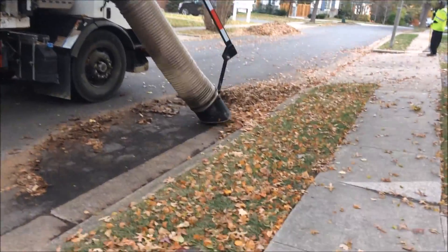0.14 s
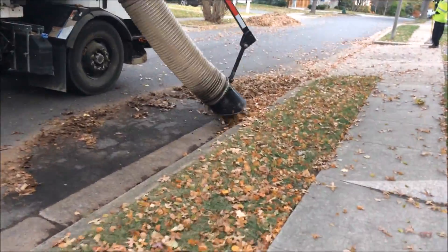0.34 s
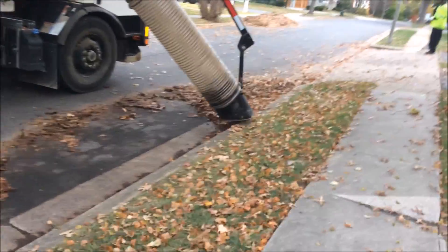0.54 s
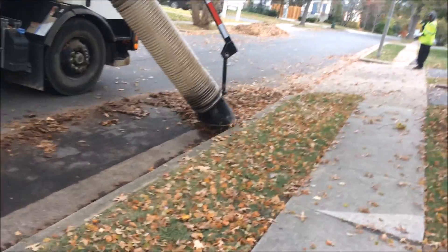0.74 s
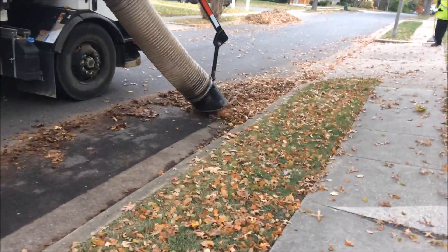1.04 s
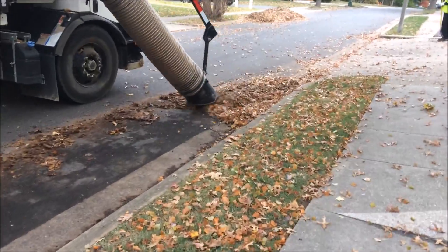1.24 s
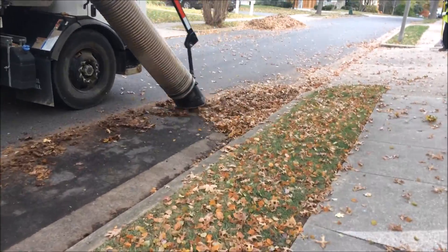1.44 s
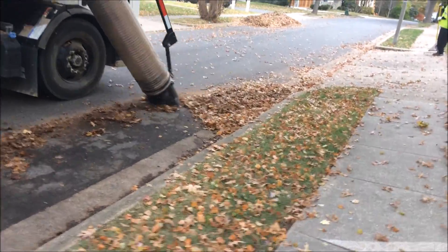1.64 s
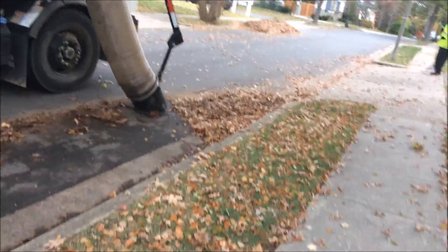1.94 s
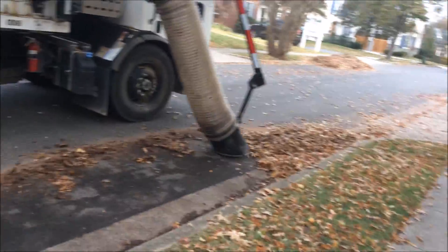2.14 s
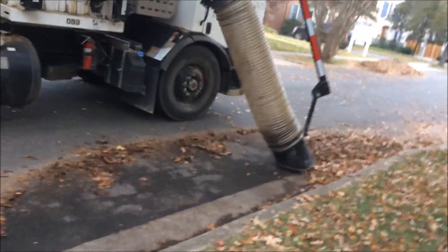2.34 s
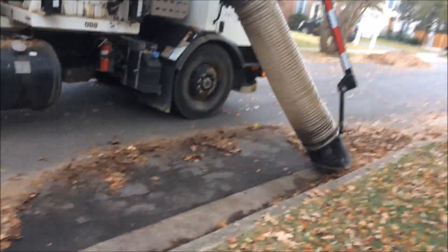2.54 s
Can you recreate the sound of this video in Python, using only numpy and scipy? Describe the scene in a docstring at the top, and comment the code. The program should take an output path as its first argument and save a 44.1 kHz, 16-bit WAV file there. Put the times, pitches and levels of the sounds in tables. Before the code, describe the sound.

Loud leaf vacuum truck with engine hum, rushing air, rustling leaves and a brief thin squeal

```python
"""A diesel drone and a broad rush of air come first: a truck-mounted leaf vacuum working along a kerb.
The engine is a stack of wavering sines over noise that booms in the fan housing; the air is filtered noise.
Leaves rustle as noise shaped by dense tiny impacts, and twigs clatter up the hose as short noise bursts.
Midway comes a thin squeal of sliding sines, likely the brakes of the creeping truck.
The treble dips briefly now and then; both channels are the same."""
import sys
import numpy as np
from scipy import signal
from scipy.fft import rfft, irfft
from scipy.io import wavfile

SR = 44100
rng = np.random.default_rng(int(sys.argv[2]) if len(sys.argv) > 2 else 0)


def output_pcm(signal):
    """Save a mono or channel-first signal as 16-bit PCM at the path in sys.argv[1].

    Samples are clipped to [-1, 1] before scaling.
    """
    pcm = np.clip(np.atleast_2d(signal).T, -1, 1) * 32767
    wavfile.write(sys.argv[1], SR, np.round(pcm).astype(np.int16))


N = 119070  # samples, 2.7 s


def undb(db):
    """Decibels to amplitude gain."""
    return 10 ** (np.asarray(db) / 20)


def unit(x):
    """Scale to rms 1."""
    return x / np.sqrt(np.mean(x ** 2))


def seconds():
    """Time of every sample."""
    return np.arange(N) / SR


def curve(rows, axis=1):
    """One column of a table, joined by straight lines in time."""
    rows = np.array(rows, float)
    return np.interp(seconds(), rows[:, 0], rows[:, axis])


def freqs():
    """Frequencies of the spectrum's bins, kept at 1 Hz or more."""
    return np.maximum(np.arange(N // 2 + 1) * SR / N, 1)


def apply_gain(x, gain):
    """Multiply the spectrum of a sound by a gain per bin."""
    return irfft(rfft(x) * gain, N)


def colour(x, points):
    """Equalise through (Hz, dB) points, straight over log frequency, then scale to rms 1."""
    hz, db = np.array(points, float).T
    return unit(apply_gain(x, undb(np.interp(np.log(freqs()), np.log(hz), db))))


def resonance(x, hz, width_hz):
    """A two-pole band-pass applied twice, each pass 2 * width_hz wide at half power; rms 1."""
    f = freqs()
    detune = (f / hz - hz / f) * hz / width_hz / 2
    return unit(apply_gain(x, 1 / (1 + 1j * detune) ** 2))


def treble(x, hz, order=6):
    """The part of a sound above a frequency, where its amplitude is halved."""
    return apply_gain(x, 1 / (1 + (hz / freqs()) ** order))


def noise():
    """White noise."""
    return rng.standard_normal(N)


def walk(rate):
    """Smooth random drift of rms 1 that changes about rate times a second."""
    return unit(apply_gain(noise(), 1 / (1 + (2 * freqs() / rate) ** 2) ** 2))


def tone(phase, db):
    """A sine with this rms level."""
    return np.sqrt(2) * undb(db) * np.sin(phase)


def turn(hz):
    """Running phase of a frequency curve, from a random start."""
    return 2 * np.pi * (np.cumsum(hz) / SR + rng.random())


def engine():
    """Firing harmonics that throb and wobble, and turbulence booming in the fan housing."""
    # engine speed: start_s [s], firing_hz [Hz]
    speed = [(0, 62.8), (.4, 62.1), (.9, 62.02), (1.5, 62.17), (2.1, 62.51), (2.7, 62.74)]
    # firing harmonics before trim: start_s [s], first_db [dB], second_db [dB], third_db [dB]
    drone_levels = [(0, -28, -35, -23), (.15, -31, -36, -15), (.29, -19.5, -23.5, -25.5),
                    (.39, -25, -23, -26.5), (.46, -17, -31, -18.5), (.53, -26, -33, -21),
                    (.61, -24.5, -25.5, -13), (.79, -27, -32, -16), (.94, -24, -22, -13.5),
                    (1.06, -31, -30.5, -17.5), (1.18, -31, -24.5, -13), (1.42, -29, -20, -27),
                    (1.67, -26, -19, -18.5), (1.95, -30, -21, -21), (2.15, -32, -20.5, -17),
                    (2.25, -27, -20, -27), (2.37, -27, -27, -18.5), (2.53, -26, -21, -16),
                    (2.7, -30, -20.5, -25)]
    # weak higher lines: multiple [of firing rate], level_db [dB, relative to untrimmed third harmonic]
    overtones = [(3.5, -21.5), (5.5, -23.5), (6, -17), (8.5, -24)]
    harmonic_trim_db = (-1, 0, -0.5)
    wobble_rad, throb_db, throb_rate = 0.4, 1.6, 17  # rms radians, rms dB, changes per second
    housing_hz, housing_width_hz, housing_db = 170.8, 32.6, -22.5

    lines = []
    for number, trim_db in enumerate(harmonic_trim_db, start=1):
        lines.append((number, curve(drone_levels, axis=number) + trim_db))
    third_db = curve(drone_levels, axis=3)
    for multiple, level_db in overtones:
        lines.append((multiple, third_db + level_db))

    firing_phase = turn(curve(speed))
    drone = np.zeros(N)
    for multiple, level_db in lines:
        start_phase = 2 * np.pi * rng.random()
        phase = multiple * firing_phase + start_phase + wobble_rad * walk(throb_rate)
        drone += tone(phase, level_db + throb_db * walk(throb_rate))
    boom = undb(housing_db) * resonance(noise(), housing_hz, housing_width_hz)
    return drone + boom


def air(flutter_db=0.75, band_flutter_db=0.76):
    """Turbulent air roaring in the hose: a steady rumble and three surging bands above it."""
    # tone of the rush: pitch_hz [Hz], density_db [dB per Hz, relative]
    roar_shape = [(20, -18), (32, -6), (55, -3), (100, 2), (150, 3.5), (240, -2), (290, -3.5), (350, -3),
                  (420, -4.5), (535, -4.5), (640, -7.5), (850, -10), (1050, -8.5), (1900, -14),
                  (2550, -15.5), (3100, -21), (6000, -28), (16000, -52)]
    # surges before trim: start_s [s], low_mid_db [dB], mid_db [dB], upper_mid_db [dB]
    flow = [(0.0, -28, -30, -29.5), (0.23, -22.5, -26, -25.5), (0.42, -26, -28, -28.5),
            (0.54, -31, -25, -25.5), (0.62, -30, -24, -23.5), (0.72, -28.5, -28.4, -27.6),
            (0.85, -25, -30.5, -30.5), (0.97, -21, -29, -27.5), (1.15, -32.5, -30.5, -30.5),
            (1.58, -28, -27.5, -27), (1.71, -27, -26.5, -27.5), (1.85, -32, -28.5, -27.5),
            (2.02, -29.5, -29.5, -29), (2.13, -25, -26, -26.5), (2.32, -26, -26, -27.5),
            (2.42, -32, -29, -24.5), (2.5, -34, -24.5, -27), (2.7, -42, -29.7, -30.5)]
    edges_hz = (197, 427, 1000)  # lower edge of each surging band
    rumble_db, band_trim_db = -26, (-2, -1, -0.5)

    roar = colour(noise(), roar_shape)
    above = [treble(roar, hz) for hz in edges_hz] + [0]  # the last band is open at the top
    rumble = undb(rumble_db) * unit(roar - above[0])
    surges = np.zeros(N)
    for k, trim_db in enumerate(band_trim_db):
        band = unit(above[k] - above[k + 1])
        level_db = curve(flow, axis=k + 1) + trim_db + band_flutter_db * walk(38)
        surges += band * undb(level_db)
    return rumble + surges * undb(flutter_db * walk(28))


def leaves(flutter_db=1.0):
    """Dense tiny leaf impacts modulate part of the energy of the nozzle's hiss."""
    # tone of the hiss: pitch_hz [Hz], density_db [dB per Hz, relative]
    hiss_shape = [(800, -1), (2000, -5), (3200, -1), (4600, -1), (6700, 0), (8500, -4), (11000, -6.5),
                  (13500, -10.5), (16000, -14.5)]
    # hiss before trim: start_s [s], treble_db [dB], top_treble_db [dB]
    hiss_levels = [(0.0, -31, -32.5), (0.2, -30.5, -33.5), (0.42, -31.5, -31.5), (0.62, -26.7, -30.7),
                   (0.72, -30.5, -32.5), (0.82, -33, -32), (0.95, -34, -37), (1.1, -32.6, -35.5),
                   (1.35, -30.5, -34.5), (1.6, -32.5, -39), (1.71, -30.2, -32), (1.8, -31.8, -38.5),
                   (1.9, -31.5, -38), (2.02, -32, -38), (2.17, -28.7, -34), (2.39, -35, -36.5),
                   (2.48, -29, -29.8), (2.7, -31.5, -33)]
    leaves_per_s, leaf_spread_db, leaf_ring_s = 2400, 1, 0.0018
    leaf_share = 0.27  # part of the hiss energy that follows the impacts
    treble_trim_db, top_trim_db, split_hz = 1.5, 1.5, 7650

    struck = rng.random(N) < leaves_per_s / SR
    strength_db = leaf_spread_db * np.minimum(rng.exponential(size=N), 5)
    hits = struck * undb(strength_db)
    # each impact adds energy that dies away exponentially
    energy = signal.lfilter([1], [1, -np.exp(-2 / (leaf_ring_s * SR))], hits ** 2)
    grain = np.sqrt(1 - leaf_share + leaf_share * energy / energy.mean())
    rustle = colour(noise() * grain, hiss_shape)

    top = treble(rustle, split_hz)
    lower = unit(rustle - top) * undb(curve(hiss_levels) + treble_trim_db)
    upper = unit(top) * undb(curve(hiss_levels, axis=2) + top_trim_db)
    return (lower + upper) * undb(flutter_db * walk(30))


def twigs():
    """Each twig or clump makes a short dry crunch of band-passed noise on the hose wall."""
    # strikes: start_s [s], level_db [dB], centre_hz [Hz], spread [octaves], length_s [s to release]
    strikes = [(.598, -24.5, 5500, 0.53, 0.011), (0.642, -25, 6440, 0.3, 0.0052),
               (.650, -19.5, 6040, 0.62, 0.01), (1.32, -25, 4800, 0.55, .008),
               (1.704, -26, 1700, .4, 0.026), (1.721, -19, 4320, .45, 0.0073), (1.8, -21, 6240, .6, 0.0068),
               (1.851, -26, 4000, 0.77, 0.0099), (1.951, -20, 4200, 0.71, 0.0072),
               (2.359, -29.5, 9000, 0.57, 0.015), (2.421, -21, 12000, .35, 0.0073),
               (2.424, -17.5, 6440, 0.65, 0.0056), (2.493, -24.5, 4300, 0.23, 0.0061)]
    attack_s, release_s = 0.0015, 0.0037

    out = np.zeros(N)
    for start_s, level_db, centre_hz, octaves, length_s in strikes:
        age = np.maximum(seconds() - start_s, 0)
        attack = np.minimum(age / attack_s, 1)
        release = np.exp(-np.maximum(age - length_s, 0) / release_s)
        band = np.exp(-0.5 * (np.log2(freqs() / centre_hz) / octaves) ** 2)
        crunch = unit(apply_gain(noise(), band))
        out += undb(level_db) * attack * release * crunch
    return out


def squeal():
    """Friction sets high metal modes singing, each with a faint octave."""
    # lower mode: start_s [s], pitch_hz [Hz], level_db [dB]
    low_mode = [(1.01, 6630, -50), (1.054, 6614, -25.5), (1.07, 6630, -29), (1.092, 6680, -27),
                (1.135, 6610, -46), (1.16, 6570, -22.5), (1.198, 6571, -18.5), (1.24, 6587, -30),
                (1.285, 6585, -33), (1.38, 6588, -23), (1.44, 6586, -20), (1.544, 6578, -29),
                (1.6, 6588, -37), (1.635, 6590, -48)]
    # upper mode: start_s [s], pitch_hz [Hz], level_db [dB]
    high_mode = [(.98, 7290, -42), (1.08, 7310, -32), (1.11, 7370, -36), (1.15, 7380, -60),
                 (1.26, 7450, -52), (1.32, 7475, -33), (1.42, 7440, -32), (1.46, 7375, -30),
                 (1.57, 7360, -32), (1.605, 7450, -55), (1.635, 7510, -37), (1.685, 7427, -27),
                 (1.725, 7330, -46)]
    # close partner that beats with the lower mode: start_s [s], pitch_hz [Hz], level_db [dB]
    beat_mode = [(1.28, 6715, -46), (1.36, 6718, -27), (1.41, 6698, -30), (1.46, 6700, -48)]
    jitter_hz, flutter_db, octave_db = 5, 1, -22  # jitter and flutter are rms

    out, t = np.zeros(N), seconds()
    for mode in (low_mode, high_mode, beat_mode):
        phase = turn(curve(mode) + jitter_hz * walk(130))
        level_db = curve(mode, axis=2) + flutter_db * walk(70)
        singing = tone(phase, level_db) + tone(2 * phase, level_db + octave_db)
        sounding = (t > mode[0][0]) * (t < mode[-1][0])
        out += singing * sounding
    return out


def scene():
    """All sources, the same in both channels."""
    return np.tile(engine() + air() + leaves() + twigs() + squeal(), (2, 1))


def record(dry):
    """The treble dips briefly now and then, and a steep low-pass cuts the very top."""
    # treble dips: centre_s [s], length_s [s, full width at half depth], above_hz [Hz]
    treble_dips = [(.023, .016, 1300), (.127, .011, 2200), (.769, .014, 1800), (.876, .018, 1300),
                   (1.004, .014, 2600), (1.58, .02, 2000), (2.069, .014, 3200), (2.283, .021, 1600)]
    dip_depth, cut_hz = 0.71, 15900  # depth is the fraction of treble taken away

    t = seconds()
    removed = np.zeros_like(dry)
    for centre_s, length_s, above_hz in treble_dips:
        bell = 1 / (1 + (2 * (t - centre_s) / length_s) ** 4)
        removed += bell * treble(dry, above_hz, order=4)
    low_pass = signal.ellip(10, 0.2, 80, cut_hz, fs=SR, output="sos")
    return signal.sosfilt(low_pass, dry - dip_depth * removed)


dry = scene()
out = record(dry)
output_pcm(out)
```